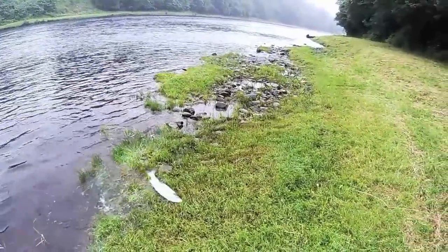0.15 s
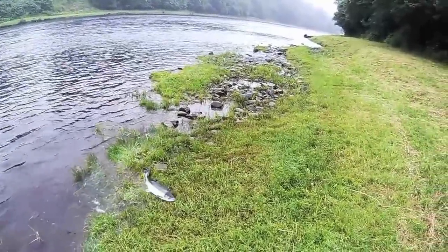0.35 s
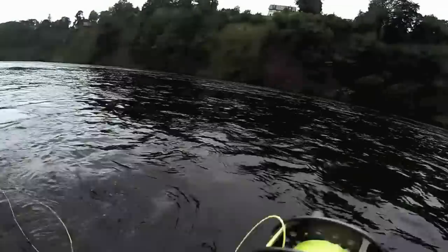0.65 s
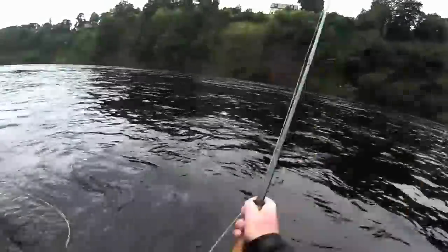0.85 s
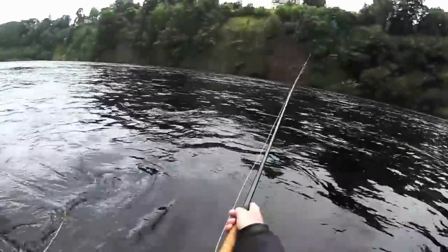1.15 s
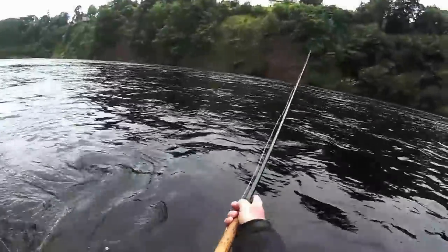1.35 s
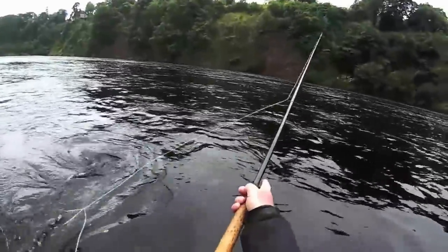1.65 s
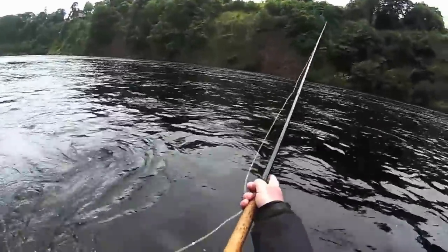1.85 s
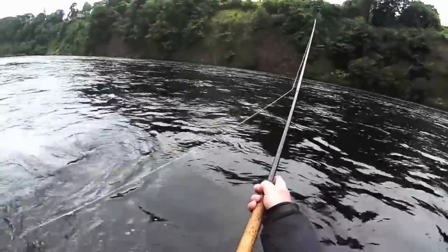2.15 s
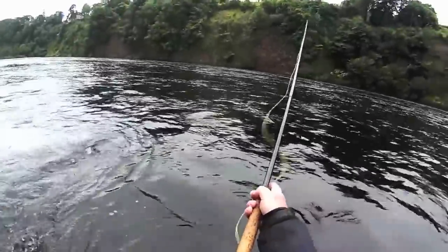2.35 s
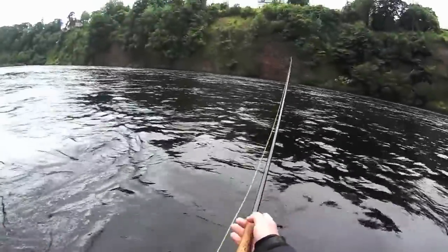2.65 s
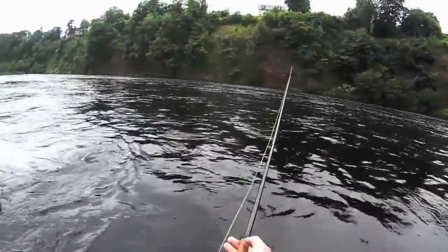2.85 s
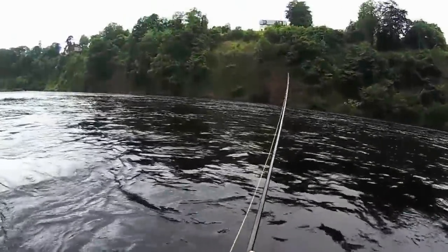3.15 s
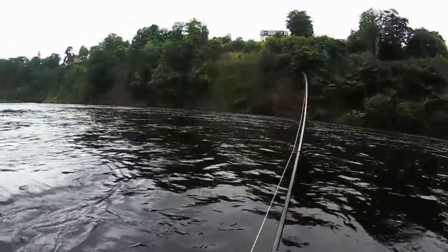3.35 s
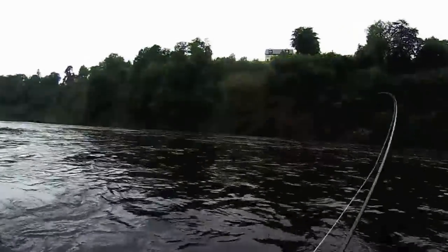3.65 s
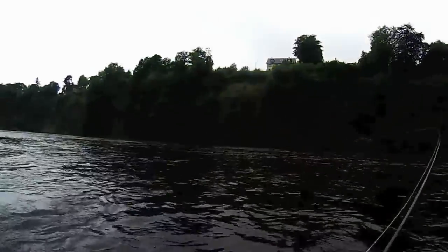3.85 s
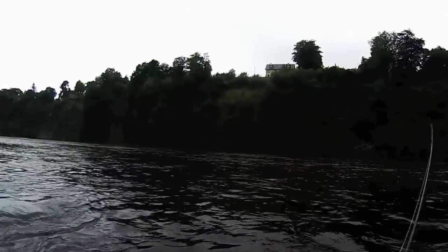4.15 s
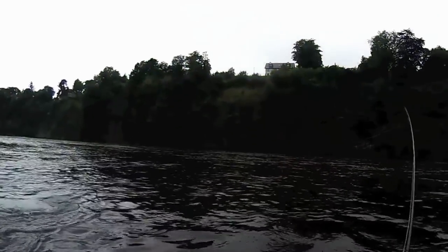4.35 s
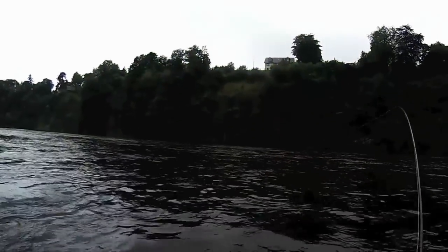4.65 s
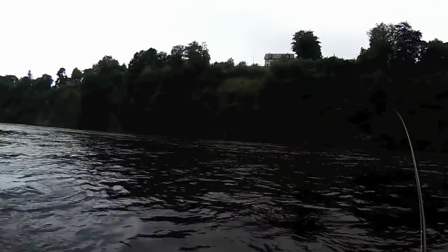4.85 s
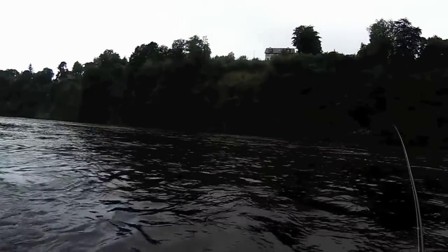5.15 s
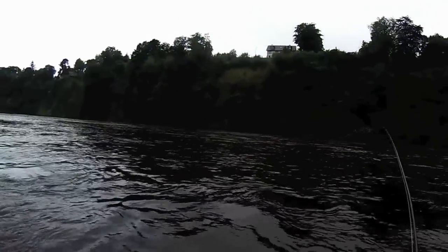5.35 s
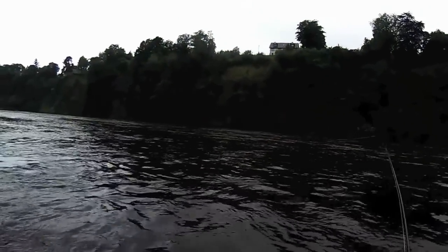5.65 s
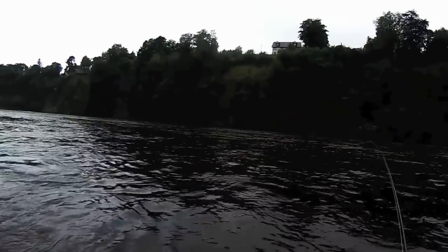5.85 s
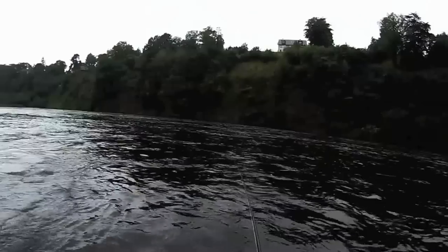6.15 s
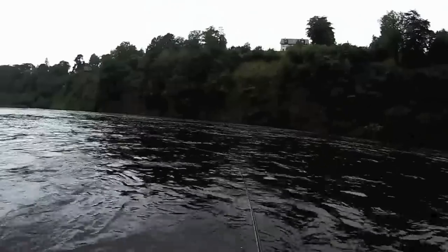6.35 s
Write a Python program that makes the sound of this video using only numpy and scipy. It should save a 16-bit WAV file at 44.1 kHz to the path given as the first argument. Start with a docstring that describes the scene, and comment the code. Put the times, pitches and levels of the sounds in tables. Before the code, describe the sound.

A soft, even river wash heard from a grassy bank, with a tiny plip and a low gulp, cuts suddenly to loud water right at a small body-worn microphone. Wavelets slap, gurgle and patter while a violent wind gust thumps and distorts. It eases to bubbling laps with milder low buffets, and a brief dropout comes near the end.

```python
"""First an even, distant wash of river with a faint plip and a low gulp, heard by a small camera on the bank.
Then an angler wears the camera while wading: close water rushes in filtered noise with a swarm of bubbles.
Wavelets slap, gurgle and patter: decaying sine tones with rising pitch are the air pockets they trap.
Wind rumbles and hisses as shaped noise and thumps at the microphone port; one strong gust overloads it.
Near 6.29 s the level dips briefly."""
import sys
import numpy as np
from scipy import signal
from scipy.fft import rfft, irfft, next_fast_len
from scipy.io import wavfile
from scipy.ndimage import uniform_filter1d, map_coordinates

SR = 44100
rng = np.random.default_rng(int(sys.argv[2]) if len(sys.argv) > 2 else 0)


def file_out(sig):
    """Save sig as 16-bit WAV at sys.argv[1]."""
    # one column per channel
    cols = np.atleast_2d(sig).T
    # limit, then scale
    lim = np.clip(cols, -1, 1)
    pcm = np.round(lim * 32767).astype(np.int16)
    wavfile.write(sys.argv[1], SR, pcm)


N = 287532  # length in samples
T = np.arange(N) / SR  # time in seconds

# wind at the port over time, before flutter and overall gains, one strong gust and later a milder one:
# start_s [s], rumble_db [dB], hiss_db [dB]
WIND = [(.78, -32, -51.5), (.85, -29.5, -47), (1.08, -25, -44), (1.17, -12, -43.5), (1.26, -9, -36.5),
        (1.33, -18.5, -54), (1.43, -12.5, -44.5), (1.48, -27.5, -49), (1.64, -36, -59.5), (2, -26.5, -50),
        (2.09, -31.5, -60.5), (2.45, -42, -63.5), (3.65, -40, -62), (4.07, -23.5, -51), (4.3, -29, -57),
        (4.58, -30.5, -53), (4.85, -19, -45.5), (5.15, -32.5, -58.5), (5.8, -32, -61.5), (6.22, -34, -60.5),
        (6.35, -42.5, -79)]
# wavelets that gurgle and break into droplets, levels before random spread:
# start_s [s], length_s [s], gurgle_hz [Hz], gurgle_db [dB], patter_db [dB]
WAVELETS = [(0.836, .08, 1110, -36, -23), (.971, .13, 910, -20, -29), (1.344, 0.14, 934, -12, -12),
            (1.631, .17, 450, -32, -24.5), (2.318, 0.08, 479, -21.5, -41), (2.767, .18, 400, -23.5, -24.5),
            (3.014, 0.059, 474, -19.5, -25), (3.232, 0.14, 472, -18, -23.5), (3.471, .2, 406, -34, -26),
            (3.749, .14, 570, -35, -25), (3.951, .2, 953, -18.5, -27), (4.325, 0.077, 900, -31, -25),
            (5.148, 0.11, 600, -13, -44), (6.368, 0.12, 492, -23.5, -29.5)]


def undb(db):
    """Turn decibels into a plain multiplier."""
    return 10 ** (np.asarray(db) / 20)


def unit(x):
    """Scale a sound to an average strength (rms) of 1."""
    return x / np.sqrt(np.mean(x ** 2))


def curves(rows):
    """Draw straight lines between the rows of a time table, giving each column a value per sample."""
    times_s, *columns = np.transpose(rows)
    return [np.interp(T, times_s, column) for column in columns]


def colour(x, points):
    """Make some pitches louder than others, following a spectrum of (Hz, dB) points."""
    size = next_fast_len(2 * len(x))
    hz, db = np.transpose(points)
    bin_hz = np.maximum(np.arange(size // 2 + 1) * SR / size, 1)
    gain = undb(np.interp(np.log(bin_hz), np.log(hz), db))
    return irfft(rfft(x, size) * gain, size)[:len(x)]


def noise(points):
    """Noise with the given spectrum and an rms of 1."""
    return unit(colour(rng.standard_normal(N), points))


def walk(rate):
    """A random wavering of rms 1 that heads for a new value rate times a second."""
    steps = rng.standard_normal(4096)
    return unit(map_coordinates(steps, [T * rate], order=1, mode="wrap"))


def add(track, s, sound):
    """Mix a short sound into a track at time s."""
    start = int(np.clip(s * SR, 0, N))
    track[start:start + len(sound)] += sound[:N - start]


def bubble(hz, t60, rise, attack_s=.0003, top=1.55):
    """A ringing air pocket; its pitch climbs as it nears the surface, where it bursts."""
    t = T[:int(np.clip(t60, .004, .4) * SR)]
    # the ring falls by 60 dB in t60 seconds, after a soft start
    envelope = np.exp(-np.log(1000) * t / t60) * (1 - np.exp(-t / attack_s))
    # it fades out just before its pitch has climbed to top times the start
    submerged = np.clip(10 * (top - 1 - rise * t), 0, 1)
    ring = np.sin(2 * np.pi * hz * t * (1 + rise * t / 2))
    return ring * envelope * submerged


def bank(gulp_db=-32, gulp_hz=200, plip_db=-27, plip_hz=1250, wash_db=-40, waver_db=1.4):
    """Many far-off splashes blur into an even noise; a faint plip and one low gulp are single bubbles."""
    # the river's spectrum from the bank, only relative: pitch_hz [Hz], level_db [dB per Hz]
    wash_spectrum = [(20, -11), (60, 4), (100, -2), (420, 1), (700, -2), (1100, -6.5), (1600, -8),
                     (2500, -14.5), (3500, -20), (6000, -22.5), (8000, -35.5)]
    out = noise(wash_spectrum) * undb(wash_db + waver_db * walk(20))
    add(out, .043, undb(plip_db) * bubble(plip_hz, 0.017, 2))
    add(out, .58, undb(gulp_db) * bubble(gulp_hz, 0.32, 1.7, attack_s=0.0087))
    return out


def river(chop_db=20, rush_db=-2.5, babble_db=-4.5):
    """Rush and babble swell with current and wind; laps, gurgles, droplets and ticks stand out of them."""
    # the current close by without wind, before the rush and babble gains: start_s [s], level_db [dB]
    current_table = [(.8, -46), (1.25, -25), (1.6, -25.5), (1.95, -29), (2.5, -34), (3, -30), (4.45, -35),
                     (5.2, -26.5), (5.55, -32), (6.25, -36), (6.52, -30.5)]
    current_db, = curves(current_table)
    _, hiss_db = curves(WIND)
    # wind ruffles the water: chop_db sets the chop against the hiss in the wind table
    flow = np.hypot(undb(current_db), undb(hiss_db + chop_db))
    moving_water = flow * (undb(rush_db) * rush() + undb(babble_db) * babble())
    return moving_water + laps() + gurgles() + droplets() + ticks()


def rush(churn_db=4.0, churn_rate=28):
    """Tumbling water as noise, split into pitch bands that each churn by themselves."""
    # spectrum of the rush, only relative: pitch_hz [Hz], level_db [dB per Hz]
    rush_spectrum = [(60, -7), (200, -5.5), (400, 0.5), (700, 2), (1050, 2), (1500, -8.5), (2100, -26.5),
                     (3000, -25), (4500, -32.5), (8000, -36.5)]
    water = noise(rush_spectrum)
    out = np.zeros(N)
    for edge_hz in (350, 600, 900, 1300, 2000):
        lowpass = signal.butter(4, edge_hz, fs=SR, output="sos")
        low = signal.sosfiltfilt(lowpass, water)
        out += low * undb(churn_db * walk(churn_rate))
        water = water - low  # what is left for the higher bands
    return unit(out + water * undb(churn_db * walk(churn_rate)))


def babble(centre_hz=900, octaves=.55, cycles=30, spread_db=6.5, rise=6, small_db=-4, count=1300):
    """A swarm of bubbles; small ones ring higher, are fainter on average and tend to die sooner."""
    out = np.zeros(N)
    times = rng.random(count) * N / SR
    for s, (size, force, life, climb) in zip(times, rng.standard_normal((count, 4))):
        hz = centre_hz * 2 ** (octaves * size)
        db = spread_db * min(force, 2) + small_db * max(size, 0)
        t60 = cycles / hz * np.exp(0.53 * life)
        add(out, s, undb(db) * bubble(hz, t60, rise * np.exp(0.87 * climb)))
    return unit(out)


def wind(flutter_db=2.5, hiss_gain_db=17, hiss_flutter_db=1.75, buffet_cycles=0.37):
    """Slow eddies rumble at the port, fine turbulence hisses, and single eddies thump."""
    # spectra of slow eddies and fine turbulence, only relative: pitch_hz [Hz], level_db [dB per Hz]
    rumble_spectrum = [(12, -7), (25, 3.5), (55, -1), (110, -4), (170, -9), (260, -13), (500, -24.5),
                       (1200, -57.5)]
    hiss_spectrum = [(150, 5), (400, 16.5), (1000, 15), (1600, 17.5), (2300, 12), (3300, 2.5), (4600, 5),
                     (6200, 6), (8000, -3.5)]
    # single eddies that strike the port: centre_s [s], level_db [dB, of the swing before its bell shape],
    # swing_hz [Hz]
    buffets = [(1.178, -5, 77.3), (1.215, -4.5, 223), (1.252, 14, 124), (1.412, 0.5, 89.3),
               (1.433, -2.5, 126), (2.067, -16, 156), (2.644, -20.5, 207), (3.737, -18.5, 168),
               (3.922, -14.5, 96.6), (4.066, -9.5, 51.2), (4.088, -11.5, 103.7), (4.384, -13.5, 116),
               (4.682, -11, 117), (4.896, -10, 231), (5.087, -6.5, 108), (5.815, -13, 83.4),
               (5.855, -14, 81), (6.116, -4.5, 510), (6.119, -5, 310), (6.124, -3, 57)]
    rumble_db, hiss_db = curves(WIND)
    eddies = noise(rumble_spectrum)
    # the gust sets the strength of the eddies; their shape is chance
    eddies /= np.sqrt(uniform_filter1d(eddies ** 2, size=SR // 14))
    out = eddies * undb(rumble_db + flutter_db * walk(55))
    out += noise(hiss_spectrum) * undb(hiss_db + hiss_gain_db + hiss_flutter_db * walk(110))
    for s, db, hz in buffets:
        length = buffet_cycles / hz  # half-length of the bell, in seconds
        t = T[:int(6 * length * SR)] - 3 * length
        thump = np.sin(2 * np.pi * hz * t) * np.exp(-(t / length) ** 2)
        add(out, s + t[0], undb(db) * thump)
    return out


def droplets(drop_hz=1500, octaves=.4, t60=0.019, spread_db=5.0, small_db=-2.5, rise=4, stray_db=-32,
             size=14, count=120):
    """Short high bubble plips: a patter from each breaking wavelet, and strays all the time."""
    out = np.zeros(N)
    falls = [(s, stray_db) for s in rng.random(count) * N / SR]
    for start_s, length_s, *_, patter_db in WAVELETS:
        falls += [(s, patter_db) for s in start_s + length_s * rng.random(size)]
    for (s, db), (small, force, life) in zip(falls, rng.standard_normal((1000, 3))):
        plip = bubble(drop_hz * 2 ** (octaves * small), t60 * np.exp(0.27 * life), rise)
        drop_db = db + spread_db * min(force, 2) + small_db * small
        add(out, s, undb(drop_db) * plip)
    return out


def laps(bubble_db=0, slap_db=0, spray_db=-8, slap_hz=1000, slap_octaves=0.089, slap_cycles=13,
         spray_s=0.0025, wobble=0.14, rise_per_s=2.7):
    """Wavelets close by: a wet click where one breaks, a plop where it shuts air in."""
    # the nearest laps, each a slap and its air pocket, levels before the wobble and spray gain:
    # start_s [s], pocket_hz [Hz], pocket_db [dB], ring_cycles [cycles to fall 60 dB], slap_db [dB]
    lap_table = [(.836, 1520, -12, 20, -17), (0.988, 1196, -8, 41, -34), (1.092, 1104, -7, 30, -15),
                 (1.212, 613, -4, 11, -7), (1.263, 960, -16, 11, 0), (1.348, 950, -14.5, 16, -7.5),
                 (1.427, 1550, -9, 49, -22), (1.454, 1510, -22, 30, -15), (1.774, 630, -18.5, 45, -16),
                 (1.848, 950, -21, 22, -11.5), (2.333, 785, -17, 83, -28.5), (2.357, 349, -15.5, 34, -27),
                 (2.36, 886, -7.5, 44, -21.5), (2.403, 2200, -20.5, 27, -25), (2.66, 930, -20, 40, -33),
                 (2.818, 971, -22, 170, -10.5), (3, 1670, -16.5, 72, -11), (3.067, 927, -15.5, 55, -22),
                 (3.312, 1475, -19.5, 87, -36), (3.558, 1495, -18, 89, -29), (3.597, 476, -21, 84, -42),
                 (3.855, 1112, -15, 71, -17.5), (3.875, 590, -11, 74, -16), (4.096, 1700, -15, 64, -17),
                 (4.304, 2450, -22.5, 40, -37), (4.32, 710, -12, 110, -11.5),
                 (4.894, 956, -18.5, 60, -12.5), (5.194, 367, -6, 29, -23), (5.268, 674, -11, 17, -34),
                 (5.388, 1325, -16, 78, -27), (6.177, 994, -20.5, 75, -44), (6.221, 1330, -21, 55, -35),
                 (6.41, 1750, -21, 34, -32), (6.43, 710, -22, 40, -26), (6.497, 739, -19.5, 85, -9.5)]
    out = np.zeros(N)
    for s, hz, db, cycles, _ in lap_table:
        add(out, s, undb(db + bubble_db) * bubble(hz, cycles / hz, rise_per_s))
    # the moving surface above the bubbles makes their ring uneven
    out *= 1 + wobble * walk(220)
    t = T[:SR // 20]
    for s, *_, db in lap_table:
        # an open cavity rings for a few cycles only, under a burst of spray
        hz = slap_hz * 2 ** (slap_octaves * rng.standard_normal())
        add(out, s, undb(db + slap_db) * bubble(hz, slap_cycles / hz, 0))
        band = signal.butter(3, [hz / 2, min(hz * 2, SR / 4)], "band", fs=SR, output="sos")
        spray = unit(signal.sosfilt(band, rng.standard_normal(len(t))))
        add(out, s, undb(db + spray_db) * spray * np.exp(-t / spray_s))
    return out


def gurgles(cycles=36, rise=6, step_s=.02, octaves_per_s=5, fade_db_per_s=35, scatter_octaves=.11,
            spread_db=2, count=6):
    """A folding wavelet sheds a chain of air pockets that tend to get smaller (higher) and fainter."""
    out = np.zeros(N)
    for s, _, hz, db, _ in WAVELETS:
        for k, (late, size, force) in enumerate(rng.standard_normal((count, 3))):
            scattered = min(k, 1)  # the first pocket keeps its exact time and pitch
            age = step_s * max(k + 0.27 * late * scattered, 0)
            pitch = hz * 2 ** (octaves_per_s * age + scatter_octaves * size * scattered)
            pocket_db = db - fade_db_per_s * age + spread_db * force
            add(out, s + age, undb(pocket_db) * bubble(pitch, cycles / pitch, rise))
    return out


def ticks(tick_db=3, decay_s=0.0011):
    """Stray drops tick on the housing: tiny bursts of bright noise that die away at once."""
    # the stray drops, before the shared tick gain: start_s [s], level_db [dB]
    tick_table = [(0.9709, -7), (2.193, -26), (2.519, -30.5), (2.8232, -26.5)]
    out = np.zeros(N)
    t = T[:SR // 100]
    for s, db in tick_table:
        add(out, s, undb(db + tick_db) * rng.standard_normal(len(t)) * np.exp(-t / decay_s))
    return out


def scene():
    """The bank, then midstream, each place faded in and out."""
    # loudness of each place over time: start_s [s], gain_db [dB]
    bank_fade = [(0, 2), (.13, 1), (.64, 0.5), (.70, -3), (.735, -13.5), (.752, -53), (.8, -94)]
    wading_fade = [(.7, -86), (.748, -44), (.765, -4.5), (.82, 0.5), (6.22, -1), (6.265, -9.5),
                   (6.293, -43), (6.315, -5), (6.35, 0.5)]
    bank_db, = curves(bank_fade)
    wading_db, = curves(wading_fade)
    on_bank = bank() * undb(bank_db)
    midstream = (river() + wind()) * undb(wading_db)
    return (on_bank + midstream)[None]


def stall(x, leak_s=0.024):
    """A capsule pushed against its stop passes no sound: its last value just leaks away."""
    # when the capsule is pinned: start_s [s], length_s [s]
    stalls = [(1.191, .005), (1.215, .007), (1.249, .004), (1.272, .004), (1.302, .014), (1.431, .004)]
    out = x.copy()
    for s, length in stalls:
        start, size = int(s * SR), max(int(length * SR), 2)
        pinned = signal.windows.tukey(size, .2)  # eases in and out of the stall
        held = x[start] * np.exp(-T[:size] / leak_s)
        out[start:start + size] += pinned * (held - x[start:start + size])
    return out


def record(dry, limit=.7, top_hz=7994):
    """The capsule stalls in the gust and rounds off loud peaks; the microphone colours and cuts the treble."""
    # microphone colour, with a deep null in the treble: pitch_hz [Hz], gain_db [dB]
    mic_colour = [(20, 2.5), (1000, 0.5), (2000, -3), (3000, -6), (3600, -14.5), (3850, -23.5), (4000, -45),
                  (4150, -22.5), (4450, -17), (5000, -11), (6200, -4.5), (7000, -4), (7500, -13),
                  (8000, -28.5)]
    x = stall(dry[0])
    x = x / (1 + (x / limit) ** 6) ** (1 / 6)  # peaks bend smoothly towards the limit
    coloured = colour(x, mic_colour)
    top_cut = signal.ellip(10, .2, 80, top_hz, fs=SR, output="sos")
    return signal.sosfilt(top_cut, coloured)[None]


dry = scene()
out = record(dry)
file_out(out)
```